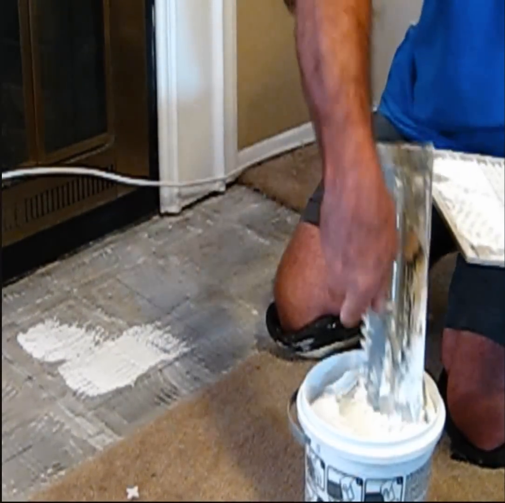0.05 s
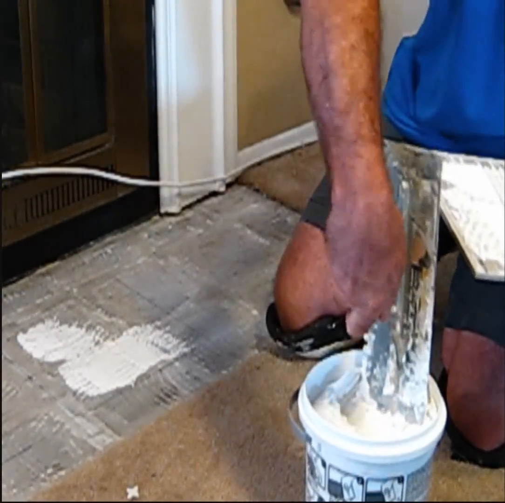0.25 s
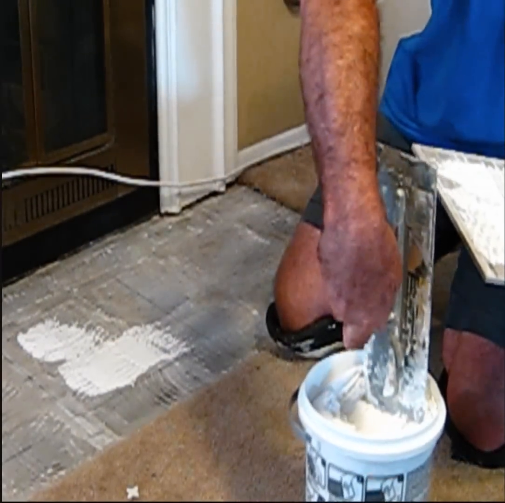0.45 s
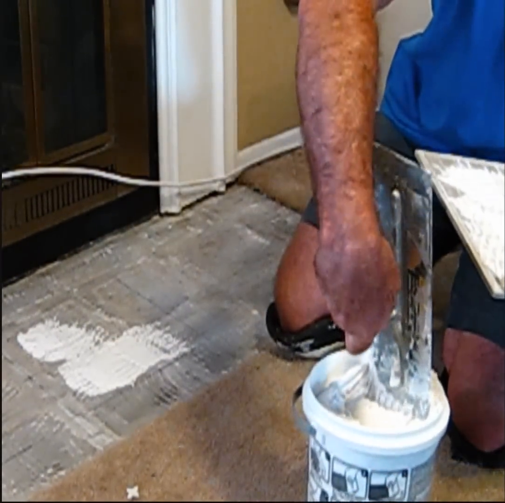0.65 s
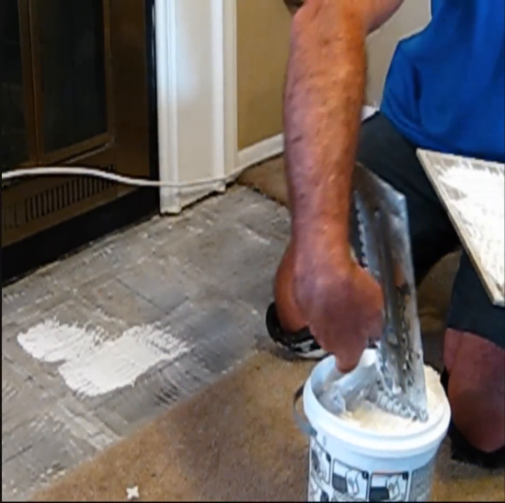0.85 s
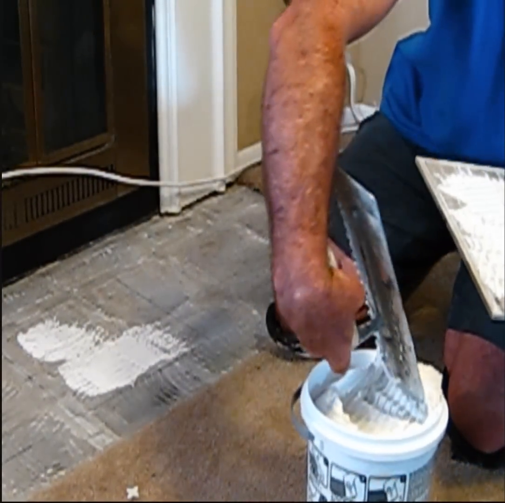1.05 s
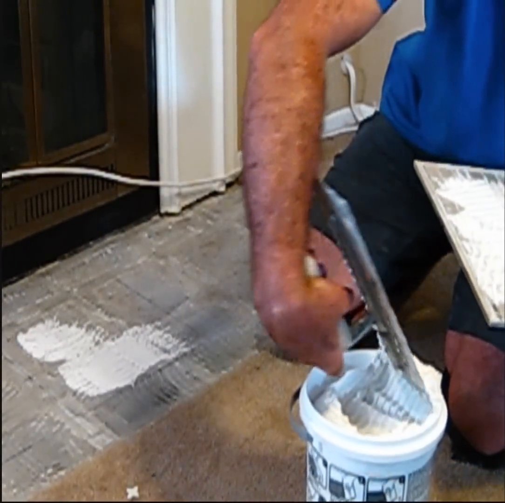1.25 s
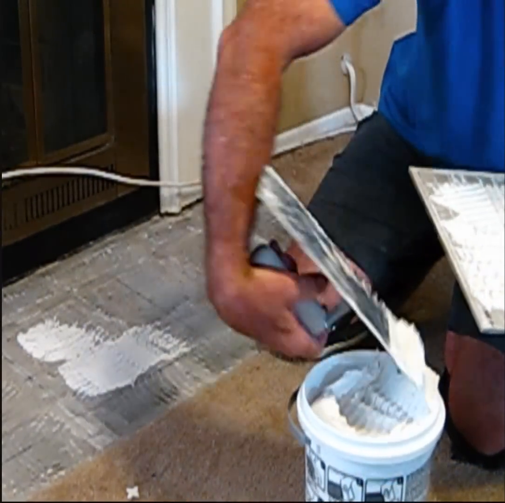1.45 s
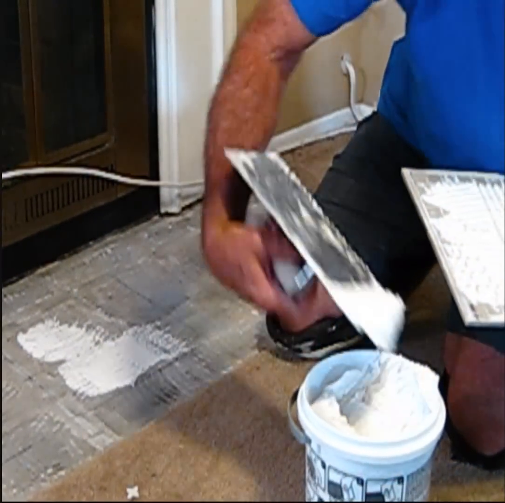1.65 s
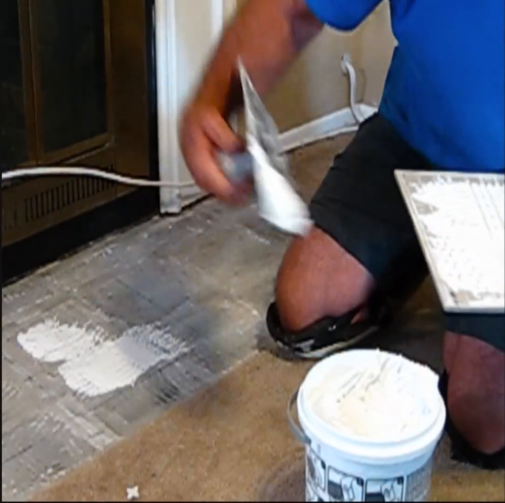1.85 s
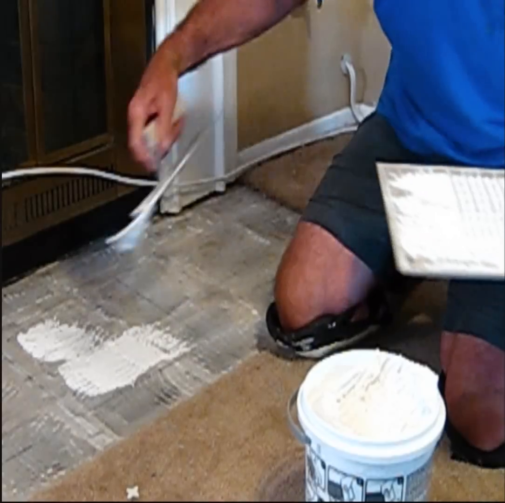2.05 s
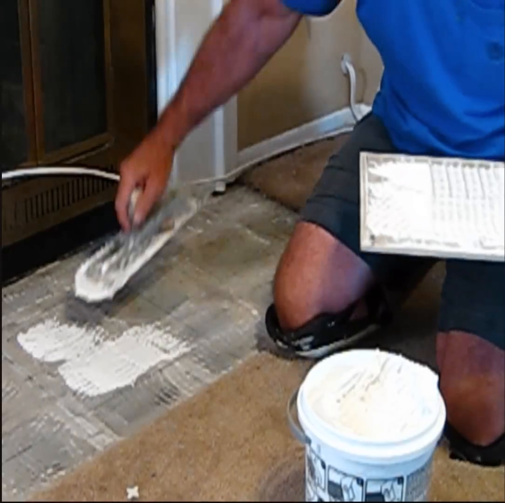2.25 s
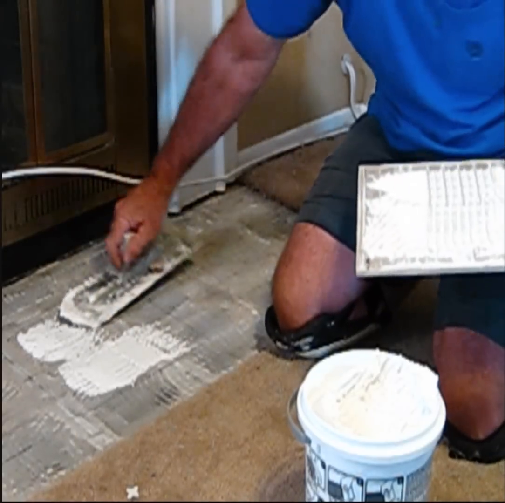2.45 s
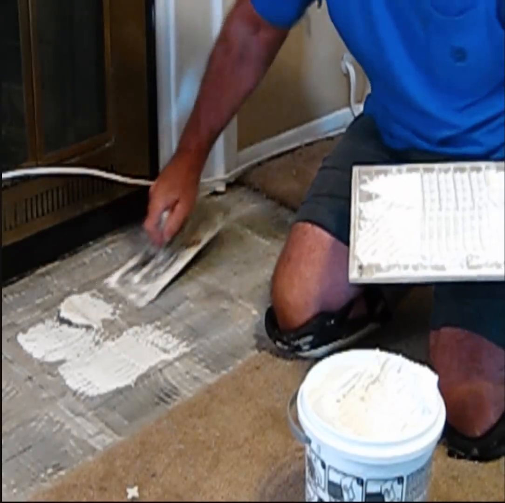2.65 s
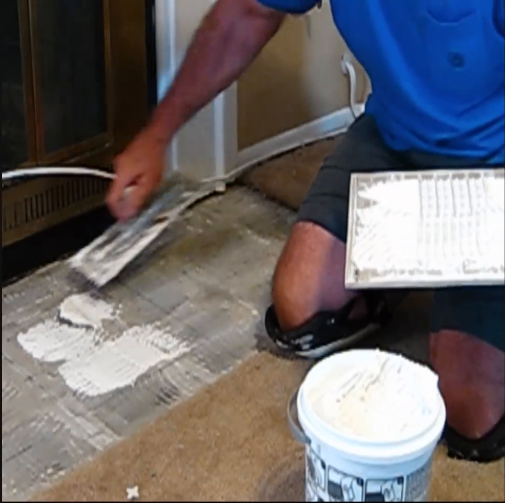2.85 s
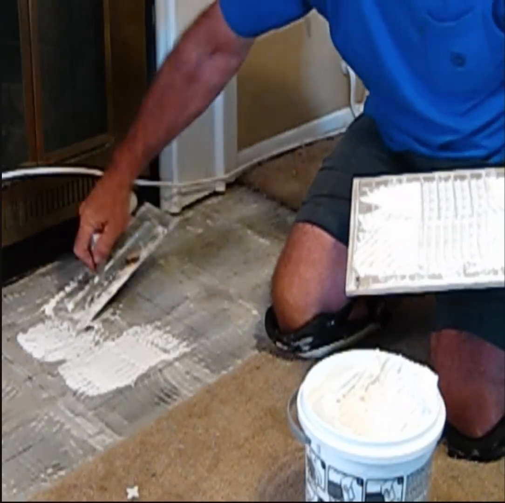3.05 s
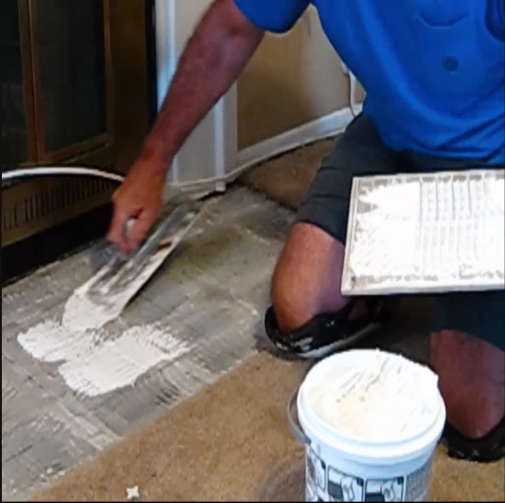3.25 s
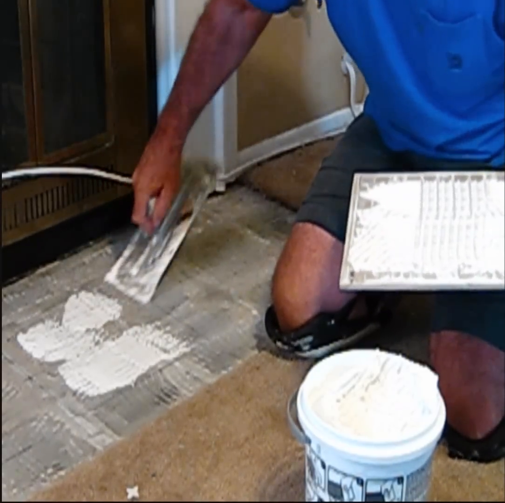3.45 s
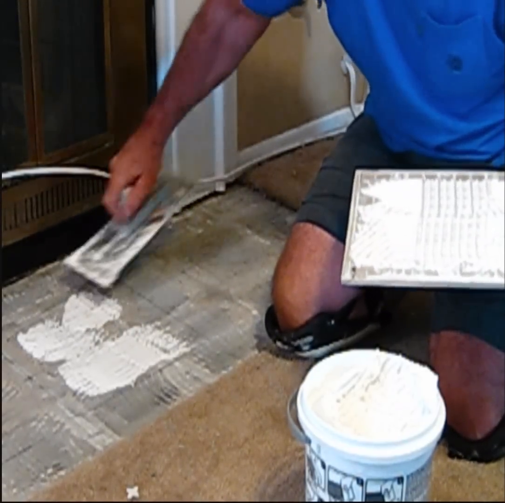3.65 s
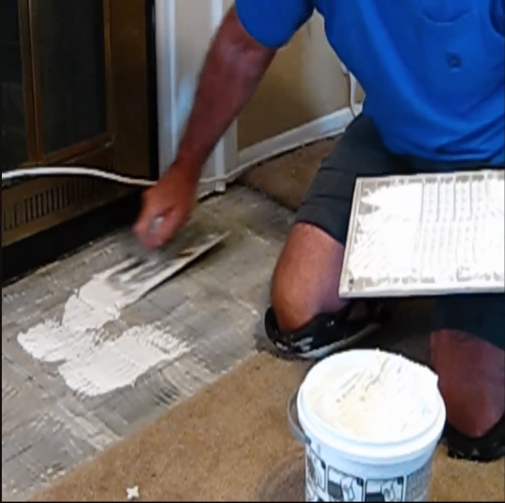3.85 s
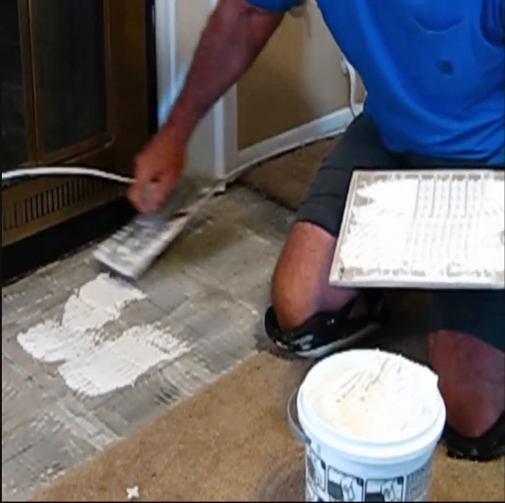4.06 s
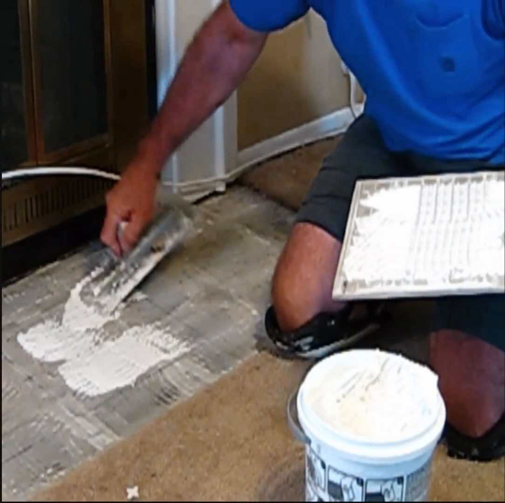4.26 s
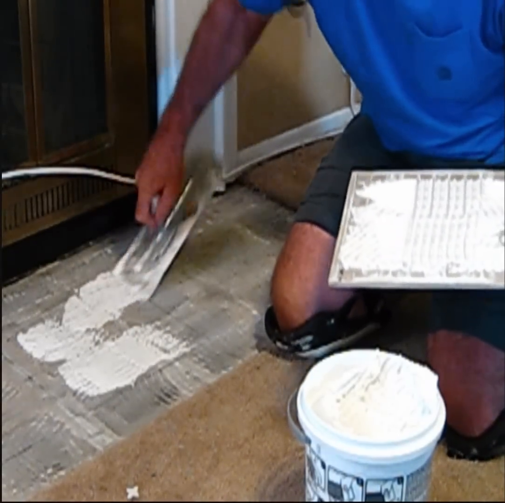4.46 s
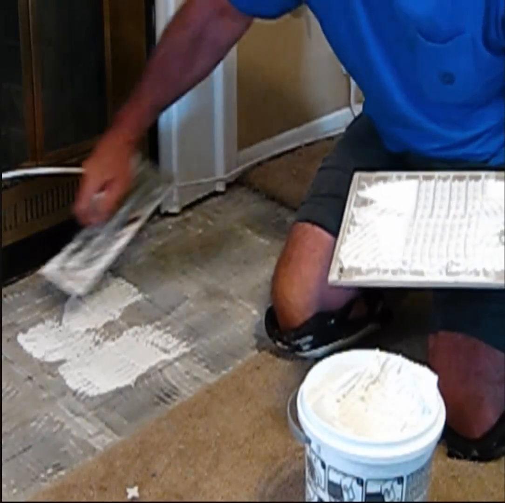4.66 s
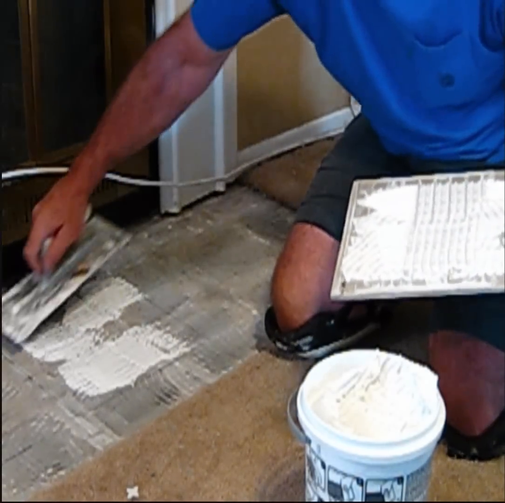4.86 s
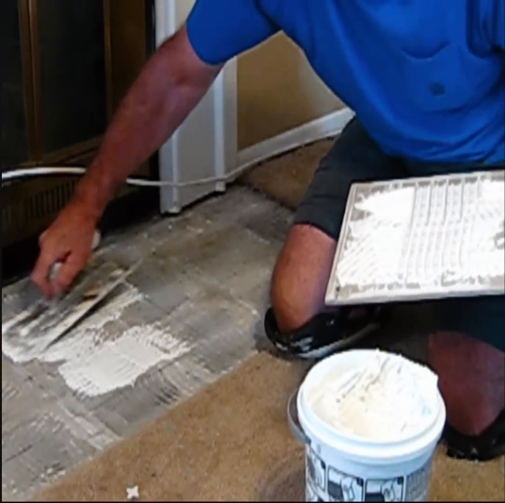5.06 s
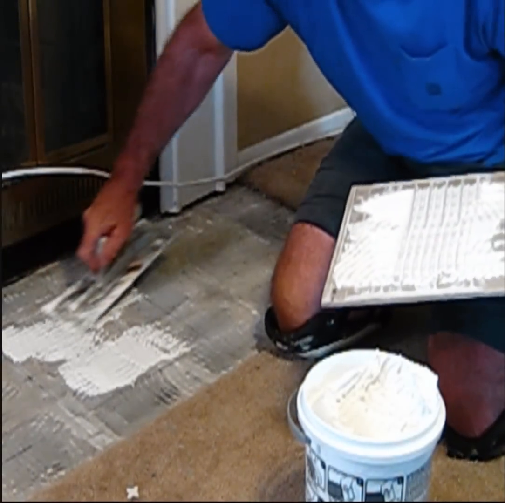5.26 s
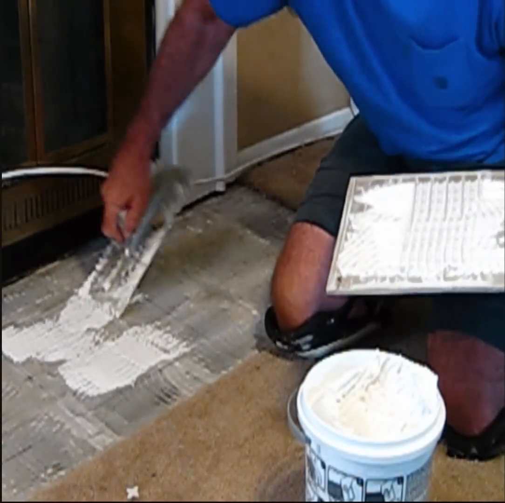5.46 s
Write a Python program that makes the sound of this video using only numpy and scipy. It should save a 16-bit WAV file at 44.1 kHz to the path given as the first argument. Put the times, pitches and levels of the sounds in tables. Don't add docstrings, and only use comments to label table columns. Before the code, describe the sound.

In a small hard room, faint ticks and one sharp click come from a trowel scooping paste in a plastic bucket. Clothing rustles softly, then the steel edge scrapes gritty cement in short rasping strokes, with hard clacks between them. Faint appliance whine and hiss stay below; close, essentially mono microphone.

```python
import sys
import numpy as np
from scipy import signal
from scipy.fft import rfft, irfft
from scipy.io import wavfile

SR = 44100
rng = np.random.default_rng(int(sys.argv[2]) if len(sys.argv) > 2 else 0)


def volts(x):
    e = np.asarray(x, float) / 20
    return 10 ** e


def wav_record(signal):
    frames = np.transpose(np.atleast_2d(signal))
    bounded = np.clip(frames, -1, 1)
    quanta = np.round(bounded * 32767).astype(np.int16)
    wavfile.write(sys.argv[1], SR, quanta)


N = 242991


def rms_one(x):
    return x / np.sqrt(np.mean(x ** 2) + 1e-20)


def in_time(rows):
    time_s, *columns = np.transpose(rows)
    return [np.interp(np.arange(N) / SR, time_s, column) for column in columns]


def at_hz(points, hz):
    table_hz, values = np.transpose(points)
    return np.interp(np.log(hz), np.log(table_hz), values)


def colour(x, spectrum):
    size = 4096
    hz = np.maximum(np.arange(size // 2 + 1) * SR / size, 10)
    cepstrum = irfft(np.log(volts(at_hz(spectrum, hz))))
    cepstrum[1:size // 2] *= 2
    cepstrum[size // 2 + 1:] = 0
    kernel = irfft(np.exp(rfft(cepstrum)))
    return signal.fftconvolve(x, kernel / np.sqrt(np.sum(kernel ** 2)))[:N]


def highpass(x, order, cut_hz):
    return signal.sosfilt(signal.butter(order, cut_hz, "high", fs=SR, output="sos"), x)


def drift(rate_hz):
    r = np.exp(-2 * np.pi * 20 * rate_hz / SR)
    noise = rng.standard_normal(N // 20 + 2002)
    slow = signal.lfilter([1], [1, -2 * r, r * r], noise)[2000:]
    return np.interp(np.arange(N) / 20, np.arange(len(slow)), rms_one(slow))


def ring(clicks, hz, t60_s):
    r = volts(-60 / (t60_s * SR))
    w = 2 * np.pi * hz / SR
    return signal.lfilter([0, np.sin(w)], [1, -2 * r * np.cos(w), r * r], clicks + 1e-18)


def rattle(start_s, length_s):
    out = np.zeros(N)
    at = round(start_s * SR)
    t = np.arange(min(4000, N - at)) / SR
    crumble = rng.standard_normal(len(t)) * np.exp(-t / max(length_s, 1e-4))
    out[at:at + len(t)] = 0.39 * crumble
    out[at] = 1
    return out


# time_s, pitch_hz, level_db
WHINE_CURVE = [(0, 615.4, -73), (1.3, 620.3, -61.5), (2.6, 626.2, -55.5), (5.51, 620.5, -59)]


def whine():
    pitch_hz, level_db = in_time(WHINE_CURVE)
    phase = 2 * np.pi * np.cumsum(pitch_hz + 1.25 * drift(6.4)) / SR
    tone = np.sin(phase) + volts(-14) * np.sin(3 * phase)
    return np.sqrt(2) * volts(level_db + 2.0 * drift(57)) * tone


# freq_hz, density_db (per Hz)
HISS_SPECTRUM = [(12, -38), (20, -6), (148, -3), (465, -4.5), (614, -3), (811, -4), (1870, -8), (2840, -13),
                 (5690, -15), (7950, -28), (8880, -24), (11700, -20.5), (15500, -29)]


def hiss():
    return volts(-54 + .5 * drift(2.6)) * colour(rng.standard_normal(N), HISS_SPECTRUM)


# start_s, peak_db, pitch_hz, ring_cycles, crumble_s
SMALL_TICKS = [(0.01, -48, 4640, 2.1, 0.043), (0.312, -42, 10500, 4.1, 0.029),
               (0.534, -43, 4440, 6.8, 0.0079), (0.595, -38.5, 985, 36, 0.00041),
               (4.338, -60, 103, 7, 0.003), (5.038, -58, 86, 7, 0.0062), (0.12, -51, 10000, 3, .03),
               (1.0254, -24.5, 2350, 9, 0.0006), (1.0255, -19.5, 4800, 11, 0.00066),
               (1.048, -55, 4900, 90, .01), (1.028, -39.5, 2100, 4.4, 0.012),
               (1.221, -47, 5800, 14, 0.0062), (1.285, -43, 12000, 3, .005), (1.466, -51, 1510, 4.9, 0.077),
               (1.488, -35, 700, 2, 0.007), (1.4885, -43.5, 2270, 5.8, 0.012), (2.361, -44, 13000, 3, .01),
               (2.516, -43, 10800, 2.4, .015), (2.526, -51, 1180, 18, 0.0088),
               (2.58, -38.5, 9050, 5.8, 0.018)]


def ticks():
    out = np.zeros(N)
    for start_s, peak_db, pitch_hz, ring_cycles, crumble_s in SMALL_TICKS:
        rung = ring(rattle(start_s, crumble_s), pitch_hz, ring_cycles / pitch_hz)
        out += volts(peak_db) * highpass(rung, 4, 0.7 * pitch_hz)
    return out


# time_s, level_db
RUSTLE_CURVE = [(1.6, -89), (1.75, -71), (2.0, -86), (2.1, -59.5), (2.3, -63.5), (2.5, -59.5), (2.62, -57),
                (2.7, -85)]
# freq_hz, density_db (per Hz)
CLOTH_SPECTRUM = [(1500, -67), (3000, -2), (5000, 1), (9000, -8.5), (15000, -10)]


def rustle():
    level_db, = in_time(RUSTLE_CURVE)
    return volts(level_db + 2.0 * drift(4.5)) * colour(rng.standard_normal(N), CLOTH_SPECTRUM)


def grit(per_s, spread_db, clump_db):
    sizes = volts(spread_db * np.minimum(rng.exponential(1, N), 4)) * rng.choice([-1, 1], N)
    born = rng.random(N) < per_s / SR
    return rms_one(sizes * born * volts(clump_db * (drift(135) + drift(18))))


def stroke(rows):
    touch_db_per_s, lift_db_per_s = 1413, 336
    t = np.arange(N) / SR
    push_db, flat_db, ring_db = in_time(rows)
    before_s = np.maximum(rows[0][0] - t, 0)
    lifted_s = np.maximum(t - rows[-1][0], 0)
    push_db = push_db - touch_db_per_s * before_s - lift_db_per_s * lifted_s
    return push_db, flat_db, ring_db, lifted_s


# time_s, push_db (grinding), flat_db (blade laid flat), ring_db (blade free to ring)
STROKE_CURVES = [
    [(2.59, -48.5, 5.5, -11)],
    [(2.638, -36, -2.5, 0.5), (2.684, -19.5, -1.5, -0.5), (2.796, -22, 1.5, 4)],
    [(3.202, -23.5, -7, 6), (3.254, -24.5, 4.5, -8.5), (3.34, -34, 9, -16), (3.354, -26.5, 7, -11),
     (3.44, -26.5, 3.5, -11), (3.455, -21.5, 0.5, -2), (3.536, -19, 4.5, -4.5), (3.582, -22.5, 4, -1)],
    [(3.982, -29.5, 2.5, -2), (4.042, -26, 1, -3)],
    [(4.34, -38.5, 7, -1), (4.382, -39.5, -8, 6), (4.41, -27, 3.5, -7.5), (4.488, -26.5, 0, -1),
     (4.52, -19.5, 10, -17), (4.565, -18.5, 3, -2)],
    [(5.05, -40.5, -3, 10), (5.068, -44.5, 1, -20)],
    [(5.205, -41, -9, 6), (5.234, -34.5, -7, 6.5), (5.294, -20, 0.5, -3.5), (5.364, -22.5, -3.5, -6),
     (5.418, -27, 3.5, -8.5), (5.435, -22, 0.5, -7), (5.51, -28.5, 7, -7)],
]


def scrapes():
    flex_per_flat, fine_per_flat, rumble_per_flat = 1.91, -.45, 0.63
    fine_lift_db_per_s = 66
    grains = grit(per_s=9000, spread_db=1.5, clump_db=0.97)
    grind, fine, rumble, ringing, flexing = np.zeros((5, N))
    for rows in STROKE_CURVES:
        push_db, flat_db, ring_db, lifted_s = stroke(rows)
        grind += grains * volts(push_db - 2.5)
        fine += grains * volts(push_db + fine_per_flat * flat_db - fine_lift_db_per_s * lifted_s - 9.0)
        rumble += grains * volts(push_db + rumble_per_flat * flat_db - 17.5)
        ringing += grains * volts(push_db + ring_db - 26)
        flexing += grains * volts(push_db + ring_db + flex_per_flat * flat_db - 33.0)
    return grind, fine, rumble, ringing, flexing


# start_s, peak_db, ring_db (blade), thump_db (slab), chatter_s
EDGE_LANDINGS = [(3.1285, -11.5, -1.5, -33, 0.018), (3.1426, -16.5, -5, -2.5, 0.011),
                 (3.19, -26, -23, -14, 0.0062), (3.8509, -8, -28, -1, 0.0049),
                 (3.8553, -12.5, 1, 4, 0.0027), (3.8621, -21.5, -21, 7.5, 0.0073),
                 (3.865, -21, -26, -3, 0.029), (3.9709, -24.5, -13, -14, 0.012),
                 (4.3295, -17.5, -3.5, -43, 0.021), (4.3439, -26.5, -21, 5.5, 0.0058),
                 (5.032, -41.5, 5, -13, 0.0036), (5.0445, -39.5, -1, 4, 0.0035),
                 (5.188, -36, -14, -6, 0.0039)]


def landings():
    grind, fine, thump, ringing, flexing = np.zeros((5, N))
    for start_s, peak_db, ring_db, thump_db, chatter_s in EDGE_LANDINGS:
        blow = volts(peak_db) * rattle(start_s, chatter_s)
        grind += blow * volts(-3.5)
        fine += blow * volts(-12)
        thump += blow * volts(thump_db)
        ringing += blow * volts(ring_db - 21.0)
        flexing += blow * volts(ring_db - 26.5)
    return grind, fine, thump, ringing, flexing


# pitch_hz, level_db, t60_s
BLADE_MODES = [(790, -16, .05), (860, -13, .06), (920, -7, .09), (1003, -7, .09), (1040, -9, .07),
               (1080, -13, .06), (1168, -11, .08), (1213, -8, .08), (1258, -8, .13), (1307, -4, .11),
               (1400, -14, .06), (1457, -11, .08), (1545, -15, .06), (1722, -16, .05), (1863, -18, .05),
               (2207, -14, .05), (2280, -15, .04), (2370, -12, .04), (2800, -16, .04), (2940, -15, .04),
               (3124, -12, .06), (3236, -15, .04), (3308, -13, .05), (3559, -13, .06), (3800, -15, .04),
               (4040, -17, .04), (4600, -17, .03), (4900, -17, .03), (5660, -18, .03), (6560, -17, .02)]


def blade(flexing, bending, grinding):
    out = np.zeros(N)
    for k, (pitch_hz, level_db, t60_s) in enumerate(BLADE_MODES):
        force = flexing if pitch_hz < 1100 else bending if pitch_hz < 1650 else grinding
        swell_db = 2.5 * drift(14)
        out += (-1) ** k * ring(force * volts(level_db + swell_db), pitch_hz, t60_s)
    return highpass(out, 3, 268)


# freq_hz, density_db (per Hz)
GRIND_SPECTRUM = [(940, -66), (1600, 0.5), (2010, 0), (2390, 4), (2590, 2), (3220, 2.5), (7300, -4),
                  (9490, -54), (16100, -120)]
# freq_hz, density_db (per Hz)
FINE_SPECTRUM = [(5000, -25.5), (8500, -0.5), (11800, -0.5), (15500, -11.5)]
# freq_hz, density_db (per Hz)
SLAB_SPECTRUM = [(110, -42), (170, -13), (290, -24), (370, 0), (450, -8.5), (580, 2.5), (780, 5.5),
                 (1000, 0.5), (1600, -46.5)]
# freq_hz, density_db (per Hz)
THUMP_SPECTRUM = [(30, -59), (70, -6), (150, 2.5), (300, 7.5), (450, 12), (800, 7), (1500, 10), (2600, -6),
                  (5000, -34)]
# freq_hz, density_db (per Hz)
BODY_SPECTRUM = [(400, -30), (600, -8.5), (800, -1.5), (1000, 9.5), (1300, 2), (1550, 3), (2100, -35.5)]


def trowel():
    grind, fine, rumble, ringing, flexing = scrapes()
    hit_grind, hit_fine, thump, hit_ringing, hit_flexing = landings()
    grind = grind + hit_grind
    ringing = ringing + hit_ringing
    flexing = flexing + hit_flexing
    contact = colour(grind, GRIND_SPECTRUM) + colour(fine + hit_fine, FINE_SPECTRUM)
    slab = colour(rumble, SLAB_SPECTRUM) + colour(thump, THUMP_SPECTRUM)
    body = colour(flexing * volts(27.5), BODY_SPECTRUM)
    return contact + slab + body + blade(flexing, ringing, grind * volts(-40.0))


# freq_hz, t60_s
ROOM_DECAY = [(100, 0.32), (500, 0.25), (1250, 0.21), (2000, 0.24), (6000, 0.2), (11000, 0.17),
              (15000, 0.067)]


def reflections():
    room_db, flutter_s, flutter_db = -10.5, .0049, -11
    late_db, late_longer = -17.5, 2.58
    t = np.arange(SR // 2) / SR
    present = (rng.random(len(t)) < .003 + (t / .04) ** 2) * (t > .003)
    echoes = rng.standard_normal(len(t)) * present
    edges_hz = 40 * 2 ** np.arange(0, 9.2, .7)
    tail = np.zeros(len(t))
    for low, high in zip(edges_hz, edges_hz[1:]):
        sos = signal.butter(3, [low, min(high, .45 * SR)], "band", fs=SR, output="sos")
        fall_db = -60 * t / at_hz(ROOM_DECAY, np.sqrt(low * high))
        decay = volts(fall_db) + volts(late_db + fall_db / late_longer)
        tail += signal.sosfilt(sos, echoes) * decay
    tail = volts(room_db) * tail / np.sqrt(np.sum(tail ** 2))
    for bounce in range(1, 4):
        at = round(bounce * flutter_s * SR * rng.uniform(.95, 1.05))
        tail[at] += volts(flutter_db - 2.7 * bounce) * (-1) ** bounce
    return tail


def room(x, count=8):
    place = np.arange(N) / (.03 * SR) % count
    out = np.zeros(N)
    for k in range(count):
        gap = np.abs(place - k)
        gap = np.minimum(gap, count - gap)
        share = np.cos(np.pi / 2 * np.minimum(gap, 1))
        out += signal.fftconvolve(x * share, reflections())[:N]
    return out


def scene():
    background = whine() + hiss()
    work = ticks() + trowel()
    return np.tile(background + work + room(work) + rustle(), (2, 1))


def dead_spot(x):
    dead_hz, width_hz, rise_db = 7900, 800, 5.5
    null = signal.lfilter(*signal.iirnotch(dead_hz, dead_hz / width_hz, SR), x)
    wide = signal.lfilter(*signal.iirpeak(dead_hz, 4.0, SR), null)
    return null - (1 - volts(rise_db)) * wide


# center_s, low_hz, high_hz
WIDE_PATCHES = [(.44, 4600, 11000), (.79, 4200, 5300), (1.44, 6900, 11000), (1.745, 11700, 13900),
                (2.09, 9500, 14500), (2.23, 4200, 9000), (2.49, 10300, 11800), (3.09, 4600, 6400),
                (3.56, 8200, 13900), (4.95, 11700, 13900), (5.32, 5700, 7000), (5.32, 9500, 12600)]


def wide_patches(mono):
    side = np.zeros(N)
    half = 900
    for center_s, low_hz, high_hz in WIDE_PATCHES:
        at = round(center_s * SR)
        near = slice(at - half, at + half)
        band = signal.butter(4, [low_hz, high_hz], "band", fs=SR, output="sos")
        level = np.std(signal.sosfilt(band, mono[near]))
        noise = rms_one(signal.sosfilt(band, rng.standard_normal(2 * half)))
        side[near] += 0.59 * level * np.hanning(2 * half) ** .5 * noise
    return side * [[1], [-1]]


def roll_off(x):
    return signal.sosfilt(signal.butter(12, 16820, fs=SR, output="sos"), x)


def record(dry):
    heard = dead_spot(dry)
    heard = heard + wide_patches(heard[0])
    treble_cut = signal.ellip(14, .5, 75, 15750, fs=SR, output="sos")
    mix = signal.sosfilt(treble_cut, heard)
    return roll_off(mix)


dry = scene()
out = record(dry)
wav_record(out)
```